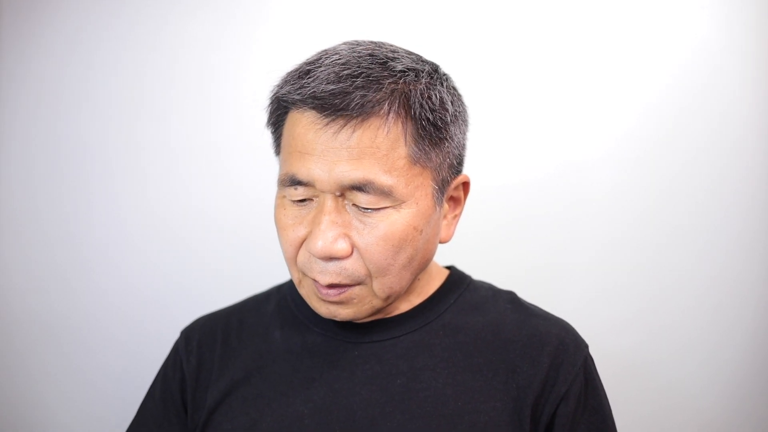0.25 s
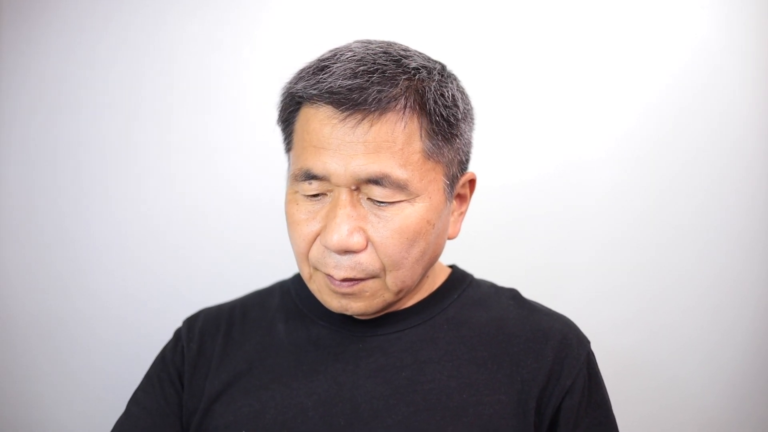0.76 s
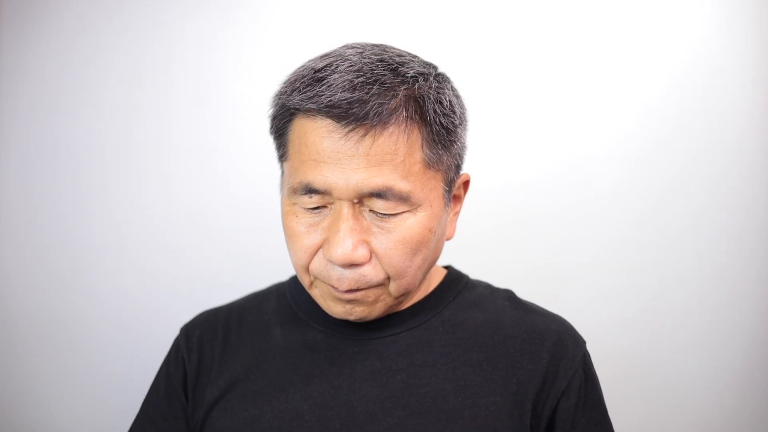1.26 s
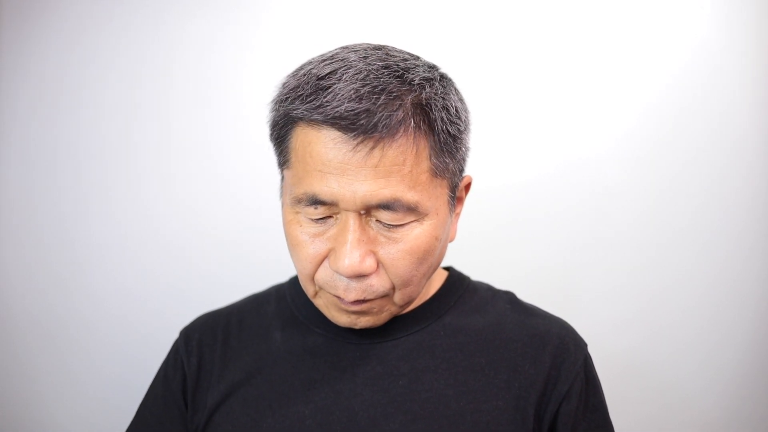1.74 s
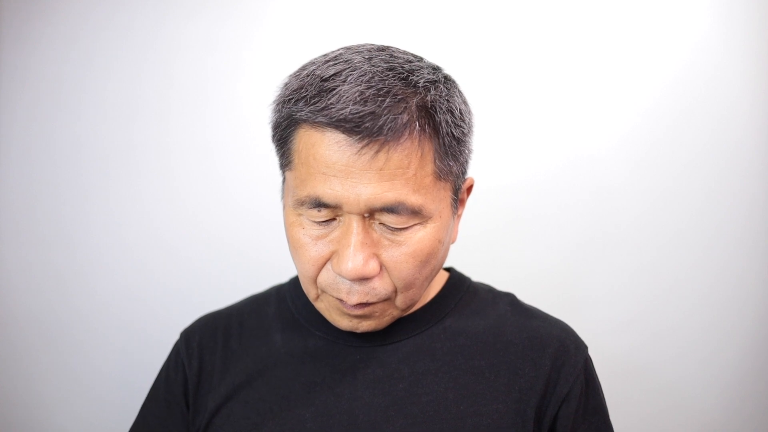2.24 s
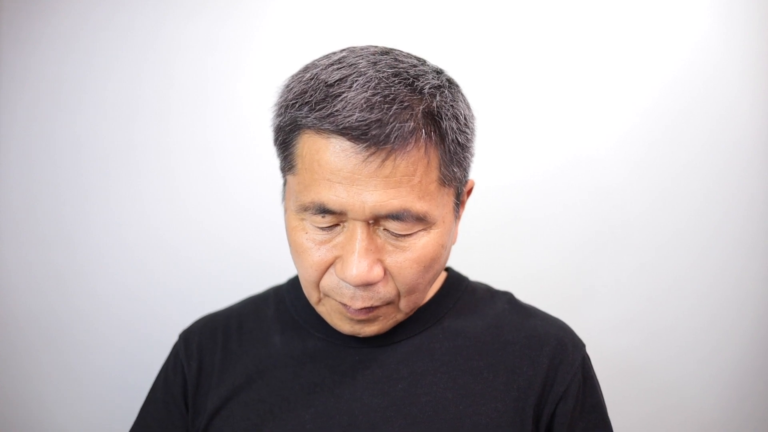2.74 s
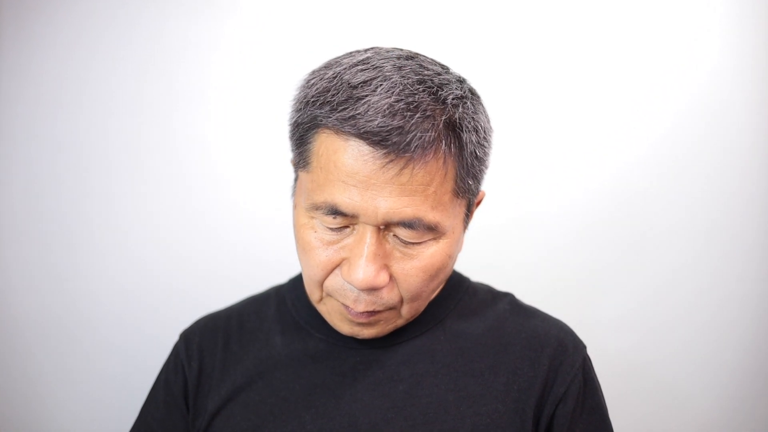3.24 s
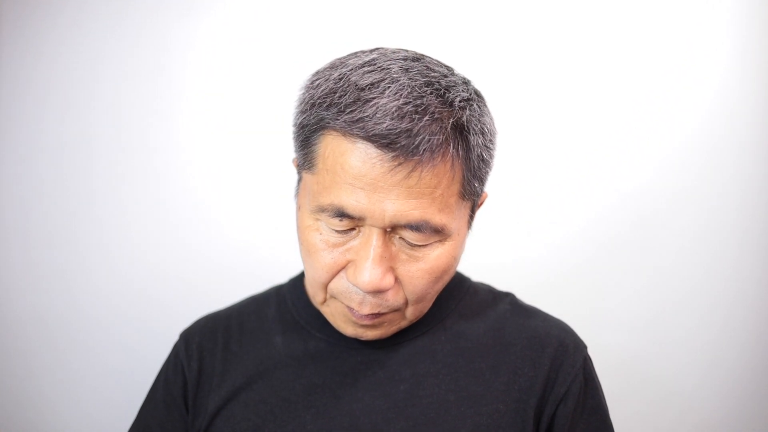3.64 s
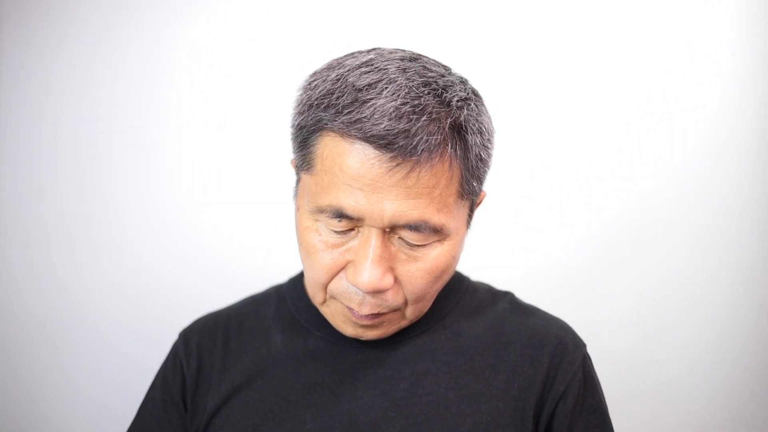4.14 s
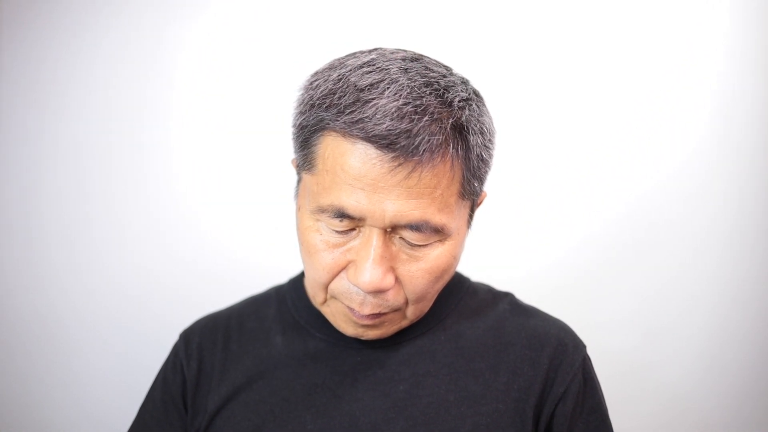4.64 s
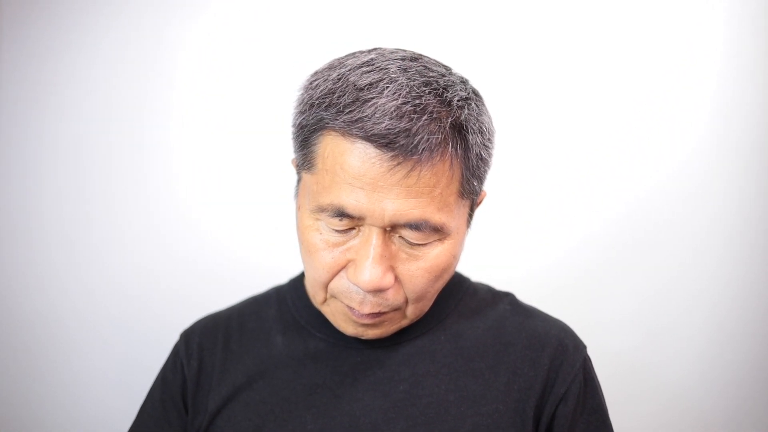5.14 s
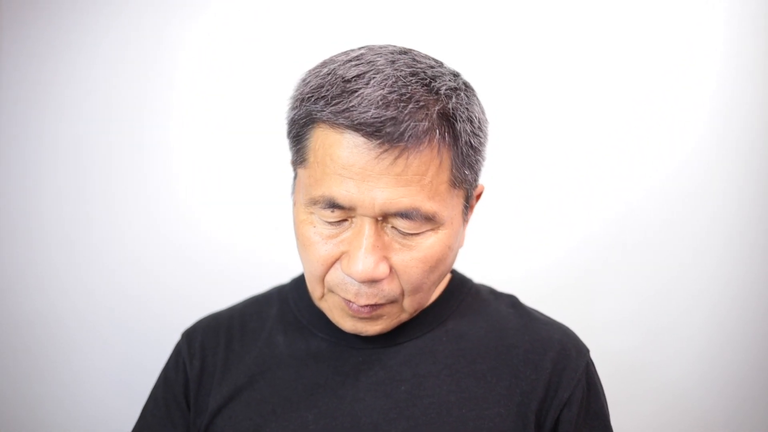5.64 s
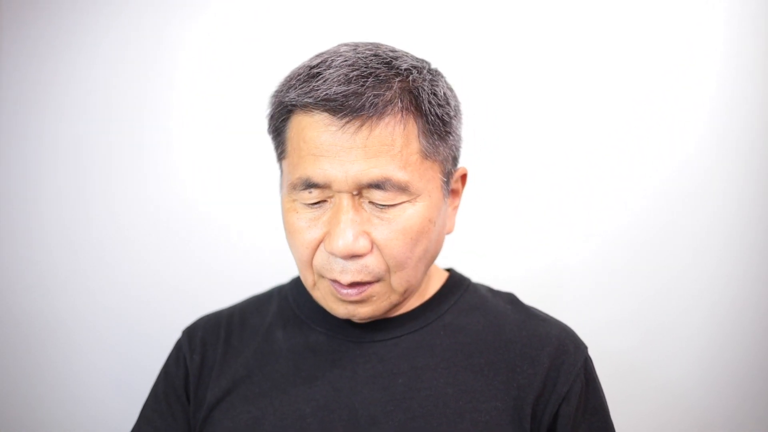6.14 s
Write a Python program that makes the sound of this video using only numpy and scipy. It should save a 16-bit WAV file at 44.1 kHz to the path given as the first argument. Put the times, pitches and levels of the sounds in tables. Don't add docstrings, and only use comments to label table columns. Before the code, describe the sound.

Hands swap a camera lens: brief metallic slide and twisting, long hushed pause, plastic cap knocks and clip, loud latch snap, then a bright button click.

```python
import sys
import numpy as np
from scipy import signal
from scipy.fft import rfft, irfft, next_fast_len
from scipy.io import wavfile
from scipy.ndimage import uniform_filter1d, map_coordinates

SR = 44100
rng = np.random.default_rng(int(sys.argv[2]) if len(sys.argv) > 2 else 0)


def file_out(sig):
    cols = np.atleast_2d(sig).T
    lim = np.clip(cols, -1, 1)
    pcm = np.round(lim * 32767).astype(np.int16)
    wavfile.write(sys.argv[1], SR, pcm)


def volts(x):
    e = np.asarray(x, float) / 20
    return 10 ** e


N = 281738
LENGTH = SR // 8
TOP_HZ = 16000

# [f/Hz, width/Hz, level/dB]
CAP_MODES = [(257, 62, -1), (861, 170, 13), (1450, 1000, -14), (2070, 110, 5.5), (2650, 200, -5),
             (3100, 220, -3), (3800, 300, -3)]


def unit(x):
    return x / np.sqrt(np.mean(x ** 2) + 1e-20)


def peak(x):
    return x / np.abs(x).max()


def along(points, hz):
    f, v = np.transpose(points)
    return np.interp(np.log(hz + 1), np.log(f + 1), v)


def strokes(rows, more_db=0):
    s, db, rise, fall = np.array(rows).T[:4, :, None]
    t = np.arange(0, N + 32, 32) / SR
    away = np.where(t < s, (s - t) / rise, (t - s) / fall)
    gain = volts(db + np.reshape(more_db, (-1, 1)) - 20 * away).sum(0)
    return np.interp(np.arange(N) / SR, t, gain)


def wobble(rate_hz):
    coarse = np.arange(0, N + 16, 16)
    knots = rng.standard_normal(int(N * rate_hz / SR) + 4)
    return np.interp(np.arange(N), coarse, map_coordinates(knots, [coarse * rate_hz / SR]))


def filtered(x, response):
    m = next_fast_len(x.shape[-1] + 8192)
    return irfft(rfft(x, m) * response(np.fft.rfftfreq(m, 1 / SR)), m)[..., :x.shape[-1]]


def shaped(x, spectrum):
    return filtered(x, lambda f: volts(along(spectrum, f)))


def resonances(modes):
    def response(f):
        return sum((-1) ** k * volts(db) * 1j * f * w / (c * c - f * f + 1j * f * w)
                   for k, (c, w, db) in enumerate(modes))
    return response


def causal(spectrum):
    ceps = irfft(np.log(volts(along(spectrum, np.fft.rfftfreq(2048, 1 / SR))) + 1e-6))
    ceps[1:1024] *= 2
    ceps[1025:] = 0
    return irfft(np.exp(rfft(ceps)))


def noise(response):
    return unit(filtered(rng.standard_normal(N), response))


def contact(t60_s, hold_s=0, blow=2.48):
    t = np.arange(LENGTH) / SR
    x = rng.standard_normal(LENGTH) * volts(-60 * np.maximum(t - hold_s, 0) / max(t60_s, .001))
    x[0] = blow
    z = rfft(x, 2 * LENGTH)
    even = irfft(z / np.sqrt(uniform_filter1d(np.abs(z) ** 2, size=150)))[:LENGTH]
    return peak(even)


def walls(x, gap_s=0.0052):
    # [f/Hz, t60/s]
    decay = [(300, 0.03), (2500, 0.11), (6000, 0.11), (14000, 0.087)]
    hz, t, z = signal.stft(rng.standard_normal(LENGTH), SR, nperseg=128)
    tail = signal.istft(z * volts(-60 * t / along(decay, hz)[:, None]), SR, nperseg=128)[1]
    delayed = np.pad(x, (int(gap_s * SR), 0))
    return signal.fftconvolve(delayed, tail / np.linalg.norm(tail))[:len(x)]


def add(track, s, db, sound, room_db):
    wet = sound + volts(room_db) * walls(sound)
    part = track[round(s * SR):][:len(wet)]
    part += (volts(db) * wet / np.abs(sound).max())[:len(part)]


def mains_hum():
    rival_db, beat_s, cancel_s = -4.5, 7.4, 4.62
    t = np.arange(N) / SR
    phase = 2 * np.pi * 120 * t + .4 * wobble(6)
    beat = np.abs(1 - volts(rival_db) * np.exp(2j * np.pi * (t - cancel_s) / beat_s))
    octave = volts(-65.5 + 2 * wobble(12)) * np.sin(2 * phase)
    return beat * volts(-48.5 + 0.48 * wobble(27)) * np.sin(phase) + octave


def fan():
    line_hz = [434.7, 543.5, 652, 91, 840, 960, 1200, 1440, 1526, 1550, 2040, 3688]
    line_db = [-60, -67.5, -90, -65.5, -68.5, -72.5, -77.5, -71, -77, -96, -74.5, -76]
    t = np.arange(N) / SR
    return sum(volts(db + 3 + 1.07 * wobble(5.04)) * np.sin(2 * np.pi * f * t + 0.65 * wobble(4.14))
               for f, db in zip(line_hz, line_db))


def building_rumble():
    # [f/Hz, level/dB per Hz]
    spectrum = [(12, -68), (20, -11), (55, 0.5), (69, 1), (86, -33), (95, -25), (110, -7), (140, -58),
                (240, -120)]
    # [t/s, level/dB, rise/s, fall/s]
    swells = [
        (.43, -64, 0.24, 0.43),
        (3.9, -60, 0.77, 0.5),
        (6.3, -68, 0.3, 1.2),
    ]
    level = (volts(-62.5) + strokes(swells)) * volts(2 + wobble(3.28))
    return level * noise(lambda f: volts(along(spectrum, f)))


def clock_whine(f):
    # [f/Hz, level/dB]
    typical = [(2000, 9.5), (4500, 11), (6000, 6.5), (8500, 18.5), (11800, 12), (13500, 12.5), (15500, 0)]
    carriers = [7671, 7744, 8643, 9254, 10250, 10834, 11243, 11814, 12145, 12287, 12567, 13232, 13472,
                13563, 14465, 14906]
    step_hz = 47.3
    comb = np.concatenate([np.arange(2040, 15700, step_hz), np.arange(6012, 15700, 1.537 * step_hz)])
    hz = np.concatenate([carriers, comb])
    comb_db = 3.5 * rng.standard_normal(len(comb)) - 2
    db = along(typical, hz) + np.concatenate([np.full(len(carriers), 8), comb_db])
    lines = np.bincount(np.round(hz / f[1]).astype(int), volts(2 * db), len(f))
    return 14 * uniform_filter1d(lines, size=14)


def hiss():
    # [f/Hz, level/dB per Hz]
    spectrum = [(100, -9), (140, -10.5), (300, -13), (500, -9), (1000, -14.5), (1700, -15.5), (3600, -25.5),
                (5500, -27), (9500, -33.5), (12300, -24.5), (13600, -29.5), (14600, -25.5), (15700, -34),
                (16000, -70)]
    # [f/Hz, width/Hz, level/dB]
    duct = [(412, 60, 2.5), (825, 82, 3), (1037, 38, 9.5), (1200, 72, 3.5), (3530, 330, 5), (4570, 56, 6.5),
            (7000, 220, 2.5)]
    # [t/s, level/dB, rise/s, fall/s]
    rustle = [
        (0, -53, .1, 0.18),
        (.8, -70, 0.98, 1.2),
        (6.2, -67.5, 0.64, 1.2),
    ]

    def response(f):
        return volts(along(spectrum, f)) * np.sqrt(1 + np.abs(resonances(duct)(f)) ** 2 + clock_whine(f))
    return (volts(-55) + strokes(rustle)) * volts(0.11 * wobble(6)) * noise(response)


def background():
    return mains_hum() + fan() + building_rumble() + hiss()


def rubbing(rows, modes, grain_db, scrape, scrape_db, patchy_db):
    grains = rng.standard_normal(N) * volts(grain_db * wobble(150))
    sing = 0
    for hz, width, db in modes:
        gain = volts(db + patchy_db * wobble(24.56))
        sing = sing + gain * signal.lfilter(*signal.iirpeak(hz, hz / width, SR), grains)
    return strokes(rows) * (unit(sing) + volts(scrape_db) * unit(shaped(grains, scrape)))


def barrel_brush():
    # [t/s, level/dB, rise/s, fall/s]
    rows = [
        (5.61, -73, .03, .2),
        (5.69, -62.5, 0.16, 0.046),
        (6.065, -58.5, 0.12, 0.029),
        (6.12, -73, .1, .05),
    ]
    return rubbing(rows, [(6900, 800, 0), (12500, 1500, -6)], 2.5,
                   [(2000, -12), (7000, -3), (12000, -1), (15700, -5)], scrape_db=-3, patchy_db=2.5)


def tab_drag():
    # [t/s, level/dB, rise/s, fall/s]
    rows = [
        (.773, -59, .008, .09),
        (.8055, -45.5, .02, .003),
    ]
    return rubbing(rows, [(5200, 700, -4), (7800, 300, -1)], 3,
                   [(1200, -12), (2500, -5), (7000, -1), (9500, -18)], scrape_db=1, patchy_db=3.5)


def mount_twist():
    # [t/s, level/dB, rise/s, fall/s]
    rows = [
        (.746, -56, 0.052, .018),
        (.802, -41, 0.038, 0.024),
        (.952, -57, .025, .1),
        (1.286, -47.5, 0.012, 0.018),
        (1.38, -57.5, 0.1, 0.27),
        (1.56, -66, .08, 0.12),
        (1.99, -59, .045, 0.14),
        (2.196, -52, 0.091, 0.15),
        (2.25, -60, .1, 0.042),
        (2.54, -51.5, 0.043, 0.13),
    ]
    # [f/Hz, width/Hz, level/dB]
    modes = [(7470, 160, -2), (11500, 380, 2), (13150, 500, -1), (14300, 900, -4), (15650, 160, -1)]
    return rubbing(rows, modes, 1.2, [(2500, -14), (5500, -11), (9000, -6), (12000, -13), (15700, -28)],
                   scrape_db=-10, patchy_db=-0.5)


def ring_slide():
    # [t/s, level/dB, rise/s, fall/s]
    rows = [
        (.006, -47, .03, .04),
        (.018, -43, 0.036, 0.045),
        (.03, -50, 0.035, 0.033),
        (.046, -48, 0.026, .012),
    ]
    # [f/Hz, width/Hz, level/dB]
    modes = [(3300, 40, -12), (5380, 34, 1.5), (7450, 45, -0.5), (9650, 48, -1), (12100, 150, -8.5),
             (13100, 36, -36), (14800, 34, -8), (15700, 51, -51)]
    slide = rubbing(rows, modes, 2.5, [(800, -19), (3000, -14), (9000, -7), (15600, -11)],
                    scrape_db=-7, patchy_db=1.5)
    low_tone = np.sin(2 * np.pi * 3320 * np.arange(N) / SR)
    return slide + strokes([(.022, -40, .022, .02)]) * low_tone


def ring_squeak():
    # [t/s, level/dB, rise/s, fall/s]
    rows = [
        (.065, -57, .016, .08),
        (.18, -61, .2, 0.027),
    ]
    start_s, start_hz, fall_hz_per_s, sag_hz_per_s3 = .05, 13600, 10000, 250000
    since = np.clip(np.arange(N) / SR - start_s, 0, .25)
    hz = start_hz - fall_hz_per_s * since - sag_hz_per_s3 * since ** 3
    phase = 2 * np.pi * np.cumsum(hz + 200 * wobble(600)) / SR
    return strokes(rows) * volts(3.1 * wobble(300)) * np.sin(phase)


def metal():
    rubs = ring_slide() + ring_squeak() + mount_twist() + barrel_brush() + tab_drag()
    return filtered(rubs, lambda f: f < 15800)


def cap_rub():
    # [t/s, level/dB, rise/s, fall/s, treble/dB]
    loose = [
        (0.0487, -43, .022, 0.028, -20),
        (4.392, -51.5, 0.015, 0.079, -15),
        (4.47, -46, 0.024, 0.043, -11),
        (4.915, -60, 0.02, .06, -20),
        (3.045, -58, .015, .05, -20),
    ]
    # [t/s, level/dB, rise/s, fall/s, treble/dB]
    seated = [
        (4.515, -37, 0.015, 0.021, -22),
        (4.939, -31, 0.01, 0.015, -5),
        (4.95, -42.5, .02, 0.034, -14),
        (5.02, -51.5, 0.057, 0.075, -10),
        (4.53, -50, .01, 0.036, -22),
        (4.957, -45, .008, 0.033, -14),
    ]
    # [f/Hz, level/dB per Hz]
    grit = [(120, -42), (200, 10), (482, -25), (916, 1), (2330, 14), (3070, -4), (5630, -26), (8270, -32),
            (14100, -41), (16000, -34)]
    rows = loose + seated
    hollow_db = [-0.5] * len(loose) + [-1] * len(seated)
    treble_db = [row[-1] for row in rows]
    grains = rng.standard_normal(N) * volts(3.5 * wobble(400))
    rub = strokes(rows) * unit(shaped(grains, grit))
    hollow = strokes(rows, hollow_db) * unit(filtered(grains, resonances(CAP_MODES)))
    treble = strokes(rows, treble_db) * unit(filtered(grains, lambda f: (f > 5000) * (f < 16000)))
    return rub + hollow + treble


def knocks(rows):
    track = np.zeros(N)
    crack_band = signal.butter(2, [4000, 15000], "band", fs=SR, output="sos")

    def shell(f):
        direct = 1j * f / (900 + 1j * f) * (6000 / (6000 + 1j * f)) ** 2
        return resonances(CAP_MODES)(f) + volts(-17) * direct
    for s, db, treble_db, t60_s in rows:
        body = filtered(contact(0.57 * t60_s, blow=9), shell)
        crack = signal.sosfilt(crack_band, contact(1.2 * t60_s))
        add(track, s, db, peak(body) + volts(treble_db + 1.5) * peak(crack), -9)
    return track


def cap():
    # [t/s, peak/dB, treble/dB, contact t60/s]
    main = [
        (4.278, -29, -7, 0.012),
        (4.3828, -29, -12, 0.022),
        (4.3935, -38, -20, 0.026),
        (4.449, -26.5, -11, 0.013),
        (4.463, -22, -20, 0.036),
        (4.499, -20, -9.5, 0.026),
        (4.669, -37.5, 1, 0.019),
        (4.9135, -34, -18, 0.034),
    ]
    # [t/s, peak/dB, treble/dB, contact t60/s]
    settling = [(4.412, -41, -25, .02), (4.455, -42, -20, .012), (4.4755, -40, -25, .015),
                (4.49, -35, -18, .015), (4.507, -30, -20, .012), (4.5225, -40, -20, .02),
                (4.9105, -37, -14, .015), (4.9305, -40, -10, .012), (4.9365, -36, -12, .01),
                (4.95, -33, -10, .015)]
    return knocks(main) + knocks(settling) + cap_rub()


def ticks():
    # [t/s, peak/dB, ring f/Hz, contact t60/s]
    soft = [(0.046, -39, 1310, 0.01), (.046, -33, 7000, .004), (.066, -35, 7500, .012),
            (.07, -37, 660, 0.019), (0.1084, -32, 1500, 0.0047), (.114, -48, 9800, .009),
            (.173, -54, 5000, .008), (2.855, -49, 5000, .008), (4.937, -41, 1600, .03),
            (4.279, -36, 1410, 0.046), (4.519, -26.5, 3100, 0.036), (4.668, -42.5, 2280, 0.028),
            (5.6, -49, 7000, .009), (5.688, -46, 12700, .01), (5.883, -45.5, 2180, .014),
            (5.905, -43, 5200, .015), (5.9571, -24, 2520, 0.0048), (6.222, -50, 5000, .01),
            (6.304, -38, 1560, 0.021), (6.318, -44, 840, 0.021)]
    # [t/s, peak/dB, ring f/Hz, low edge f/Hz, high edge f/Hz]
    hard = [(0.054, -26.5, 1890, 900, 5500), (0.083, -39, 1600, 600, 6000), (.189, -32, 6050, 1300, 10500),
            (0.803, -49, 5160, 1500, 15000), (.951, -32, 6300, 1200, 12500),
            (4.5138, -25.5, 3040, 1000, 15000), (3.026, -43.5, 5500, 1500, 6000),
            (3.037, -33.5, 900, 600, 4400), (4.939, -23, 1570, 1200, 14000),
            (4.996, -26.5, 13200, 3500, 16000), (5.036, -38, 2200, 1200, 5430),
            (6.1328, -38, 2930, 400, 3780), (5.0078, -28, 4060, 3000, 15000),
            (5.0468, -38, 7450, 3000, 14000), (5.3913, -12, 10400, 2020, 15000),
            (5.902, -42, 10300, 4500, 14000), (5.935, -29.5, 7460, 2000, 16500),
            (5.945, -47, 7000, 1500, 10000), (6.057, -36, 9100, 3000, 11500)]
    # [t/s, peak/dB, f/Hz, contact t60/s]
    thuds = [
        (6.005, -39, 175, 0.18),
        (4.5, -39, 290, 0.038),
    ]
    track = np.zeros(N)
    touches = [(s, db, 0.67 * hz, 1.51 * hz, hz, t60_s) for s, db, hz, t60_s in soft]
    touches += [(s, db, low_hz, high_hz, hz, 0.013) for s, db, hz, low_hz, high_hz in hard]
    for s, db, low_hz, high_hz, ring_hz, t60_s in touches:
        ring = resonances([(ring_hz, 0.093 * ring_hz, 5)])
        band = signal.butter(3, [low_hz, min(high_hz, 17000)], "band", fs=SR, output="sos")
        tick = signal.sosfilt(band, contact(t60_s))
        add(track, s, db, filtered(tick, lambda f: ring(f) + 1), -11)
    for s, db, hz, t60_s in thuds:
        body = resonances([(hz, 90, 0)])
        add(track, s, db, filtered(contact(t60_s), lambda f: body(f) ** 2), -20)
    return track


def snaps():
    # [t/s, peak/dB, ring/dB, buzz/dB, grit/dB]
    events = [
        (4.9444, -12, -17.5, -10.5, -5),
        (5.3865, -0.5, -12.5, -13, -10),
        (5.9588, -6.5, -12, -22, -18),
    ]
    # [delay/s, level/dB]
    rebounds = [
        (.0018, -2),
        (.0018, -4),
        (.00118, -4),
    ]
    # [f/Hz, width/Hz, level/dB]
    bodies = [
        [(856, 260, -3), (2220, 270, 0), (3600, 300, -4.5), (4200, 450, -4), (5160, 220, -11), (6810, 190, -11),
         (8510, 400, -7.5), (9600, 220, -15), (10900, 270, -16), (12170, 400, -3), (14300, 460, -16)],
        [(1060, 400, -1), (1800, 180, -19), (2700, 500, 1.5), (3850, 400, 1), (4900, 300, -11), (6350, 450, -6),
         (7600, 650, -8), (8950, 260, 0), (10600, 700, -2), (11400, 260, -12), (12400, 300, -5),
         (14000, 600, -4)],
        [(3310, 400, -25), (4580, 360, -19), (7100, 600, -20), (8400, 210, 1), (9800, 410, -11),
         (10500, 370, -9), (11400, 230, -11), (11640, 250, -11.5), (12700, 360, 1.5), (14200, 600, -19)],
    ]
    edge_hz = [500, 730, 1800]
    # [f/Hz, level/dB per Hz]
    colours = [
        [(88, -39), (150, -11), (472, -19), (889, -7), (1640, -17), (2120, 4), (2910, 1), (3770, 7),
         (5380, -16), (5940, -29), (8310, -7), (10500, -16), (12100, -5), (16000, -30), (16900, -84)],
        [(150, -47), (600, -12), (1000, 0), (1770, -8), (2520, 6), (3780, -4), (4430, -10), (5290, -4),
         (6310, -7), (8510, -17.5), (10300, -1.5), (12300, -12), (14200, -2), (15800, -15), (16900, -63)],
        [(470, -55), (800, -34), (1480, -36), (3260, -14), (3850, -27), (4660, -18.5), (5790, -27), (7770, -16),
         (8280, 12), (9660, -7), (11100, -10), (12800, 2), (14500, -19), (15900, -38), (16900, -65)],
    ]
    # [f/Hz, level/dB, t60/s]
    rings = [
        [(834, -11, 0.23), (2143, -2, 0.12), (2546, 0, 0.077), (5033, -9, 0.063), (8958, -11, 0.086),
         (11220, -12, 0.089), (12530, -15, 0.1), (13590, -23, 0.19)],
        [(781, -3, .04), (2540, -3, .05), (2998, -5, 0.05), (6228, -18, 0.23), (10300, -8, 0.084),
         (11120, -2, 0.056), (11980, -2, 0.062), (12850, -11, 0.096), (13340, -12, 0.1), (13590, -11, 0.089),
         (14610, -6, 0.062), (15550, -10, 0.08)],
        [(5717, -24, 0.067), (8366, -4, 0.069), (8522, -10, 0.085), (9281, -16, 0.075), (9480, -19, 0.094),
         (10440, -19, 0.07), (11910, 0, 0.033), (12490, -21, 0.19), (12660, -16, 0.12), (13470, -26, 0.089)],
    ]
    hand_t60_s = .075
    track, t = np.zeros(N), np.arange(LENGTH) / SR
    for event, rebound, body, low_hz, colour, modes in zip(events, rebounds, bodies, edge_hz, colours, rings):
        s, db, ring_db, buzz_db, grit_db = event
        delay_s, again_db = rebound
        blows = np.zeros(LENGTH)
        blows[0] = 1
        blows[round(delay_s * SR)] = volts(again_db)
        struck = filtered(blows, resonances(body))
        grit = signal.fftconvolve(contact(t60_s=0.01, hold_s=0.0011, blow=2.9), causal(colour))[:LENGTH]
        ring = sum(volts(level - 60 * t / min(t60_s, hand_t60_s)) * np.sin(2 * np.pi * hz * t)
                   for hz, level, t60_s in modes)
        evened = [(hz, 0.51 * level) for hz, level in colour]
        buzz = signal.fftconvolve(contact(t60_s=0.077), causal(evened))[:LENGTH]
        parts = peak(struck) + volts(grit_db) * peak(grit)
        parts += volts(ring_db) * peak(ring) + volts(buzz_db) * peak(buzz)
        highpass = signal.butter(4, low_hz, "high", fs=SR, output="sos")
        add(track, s, db, signal.sosfilt(highpass, parts), -13.5)
    return track


def scene():
    # [f/Hz, level/dB per Hz]
    spectrum = [(18, -30), (30, 4), (75, -8), (134, -14), (189, -2.5), (649, -4.5), (1460, -9.5),
                (1630, -7), (4080, -4), (13700, -4.5), (16000, -6)]
    mono = background() + metal() + cap() + ticks() + snaps()
    stray_noise = noise(lambda f: volts(along(spectrum, f)) * (f < TOP_HZ))
    stray = volts(-72) * wobble(900) * mono + volts(-71.5) * stray_noise
    return np.array([mono + stray, mono - stray])


def low_pass(x):
    return signal.sosfilt(signal.butter(12, 17090, fs=SR, output="sos"), x)


def record(dry):
    band = signal.butter(10, TOP_HZ, fs=SR, output="sos")
    mix = signal.sosfilt(band, dry)
    return low_pass(mix)


dry = scene()
out = record(dry)
file_out(out)
```